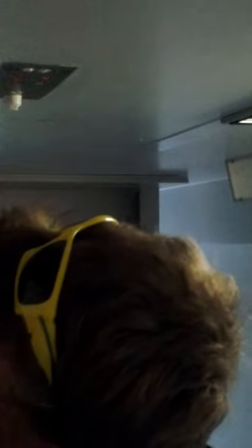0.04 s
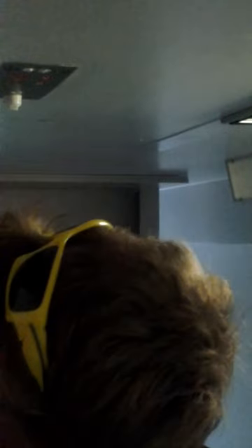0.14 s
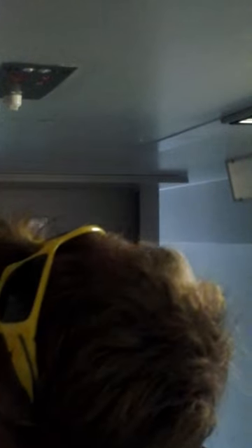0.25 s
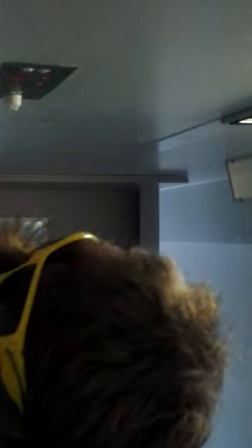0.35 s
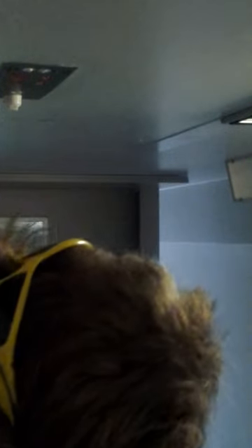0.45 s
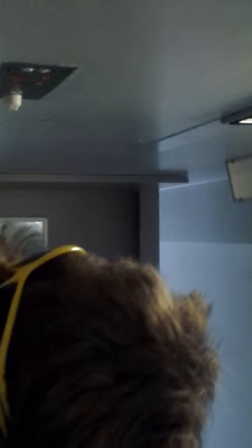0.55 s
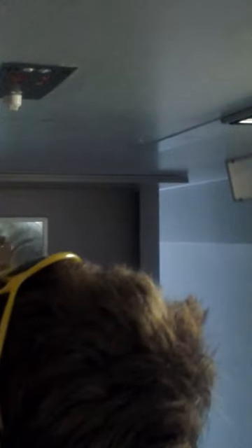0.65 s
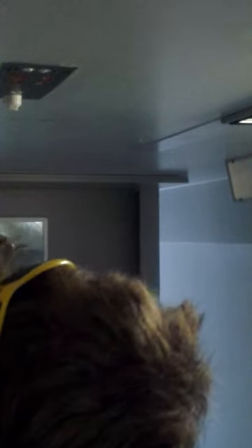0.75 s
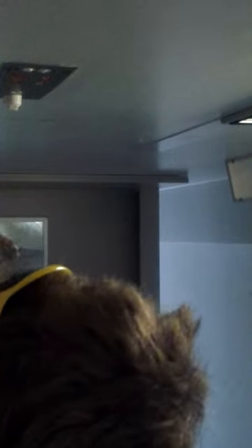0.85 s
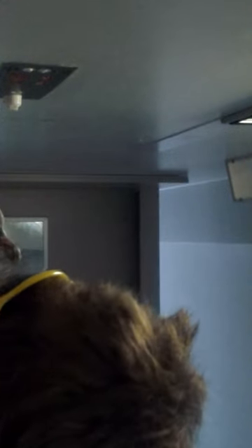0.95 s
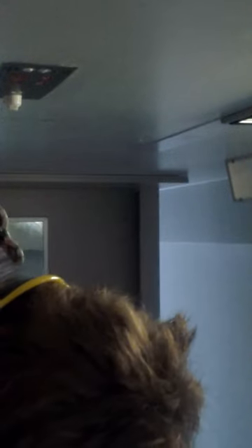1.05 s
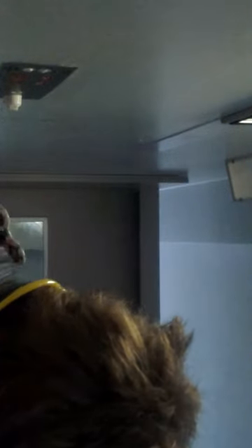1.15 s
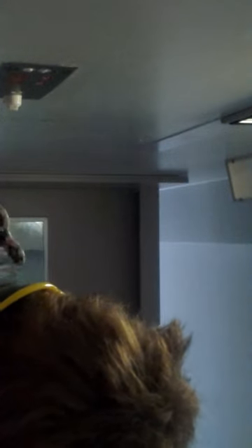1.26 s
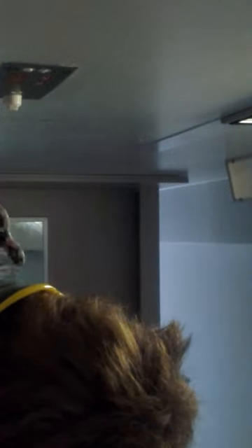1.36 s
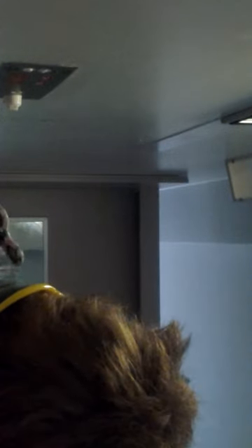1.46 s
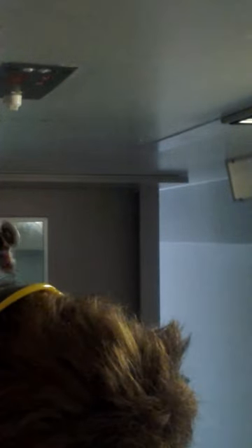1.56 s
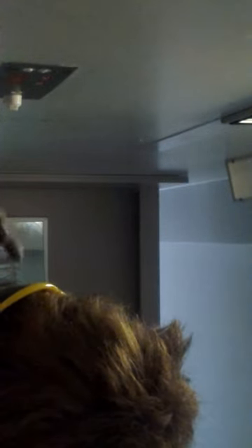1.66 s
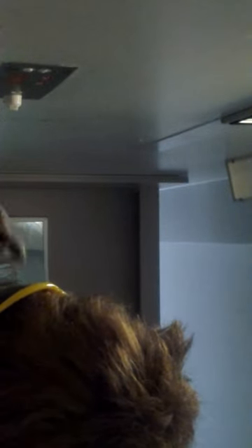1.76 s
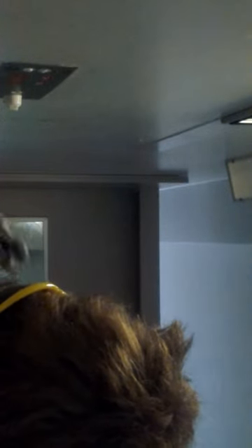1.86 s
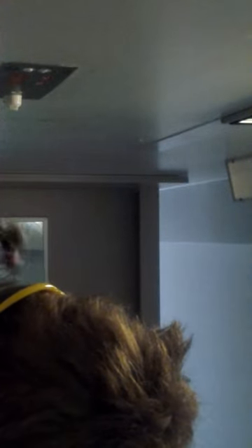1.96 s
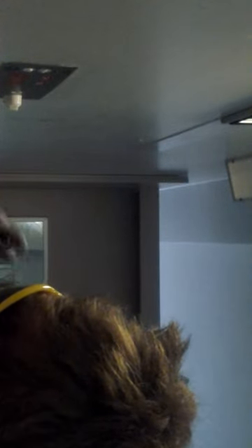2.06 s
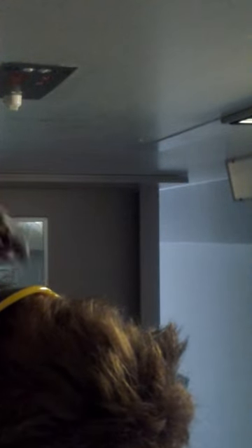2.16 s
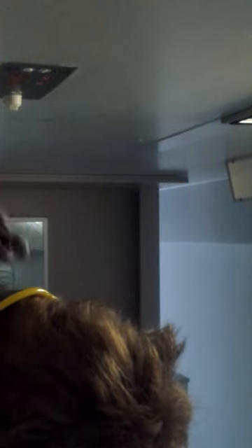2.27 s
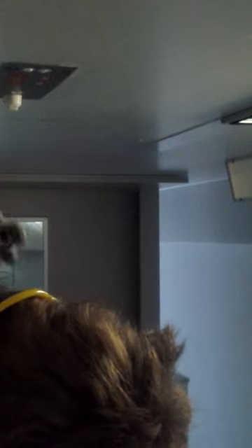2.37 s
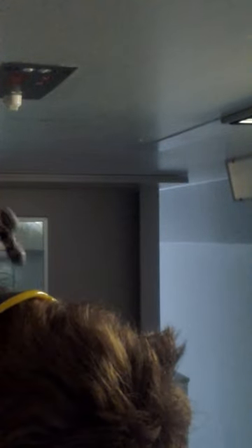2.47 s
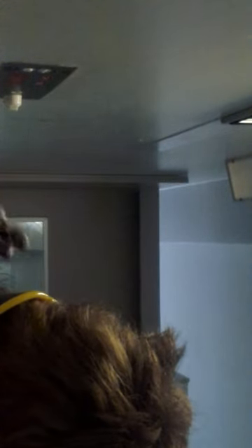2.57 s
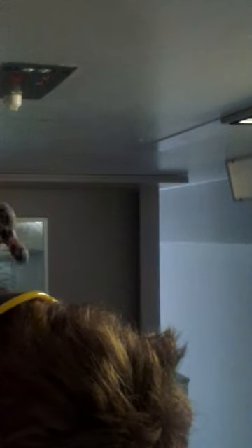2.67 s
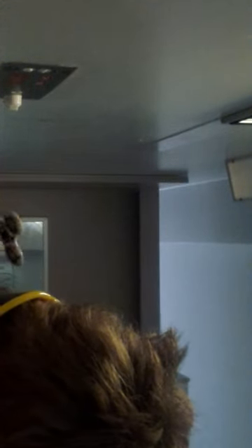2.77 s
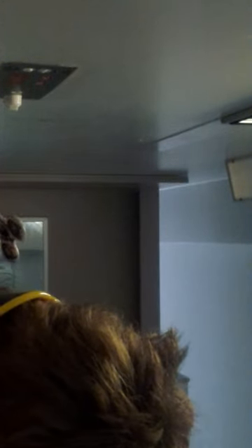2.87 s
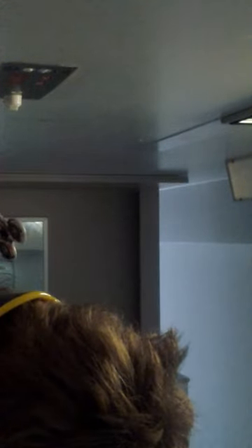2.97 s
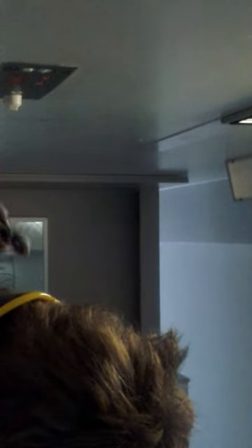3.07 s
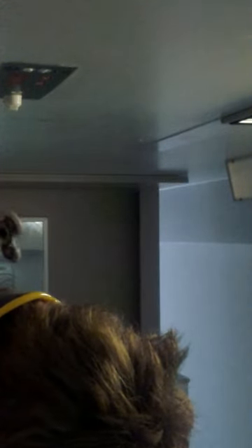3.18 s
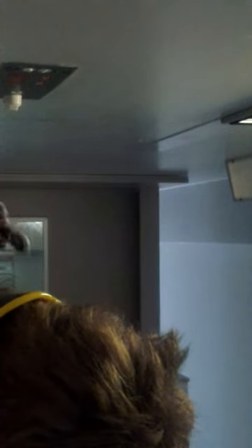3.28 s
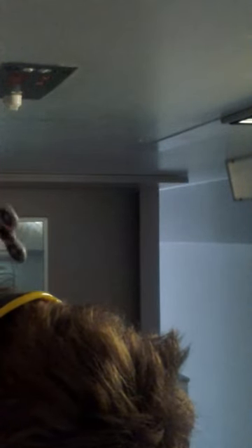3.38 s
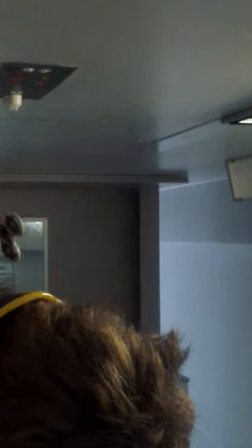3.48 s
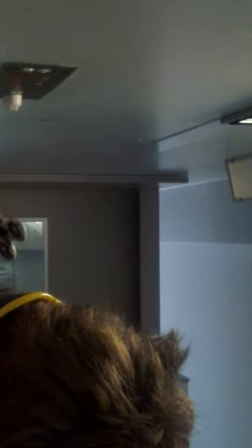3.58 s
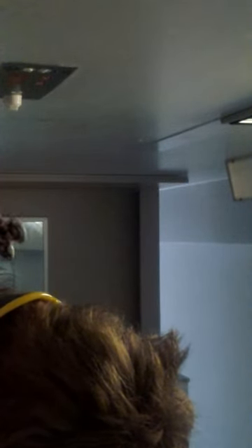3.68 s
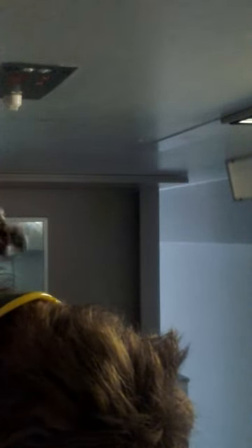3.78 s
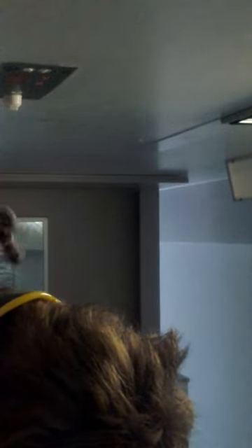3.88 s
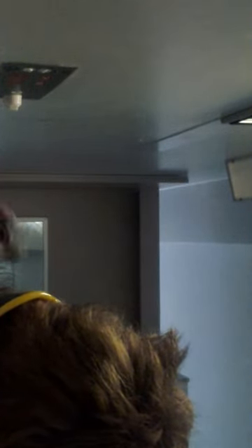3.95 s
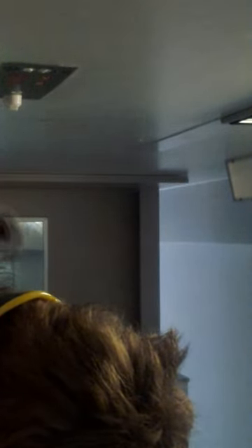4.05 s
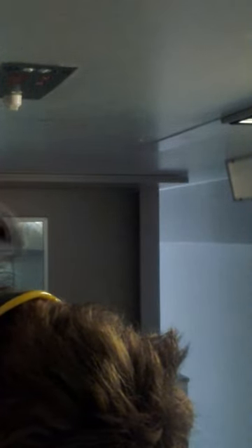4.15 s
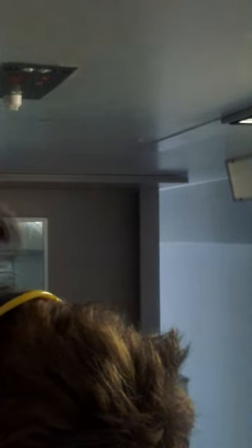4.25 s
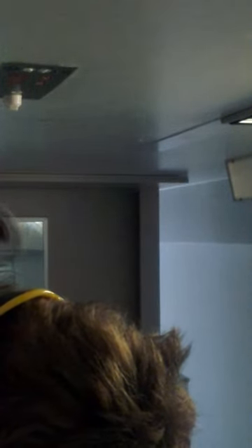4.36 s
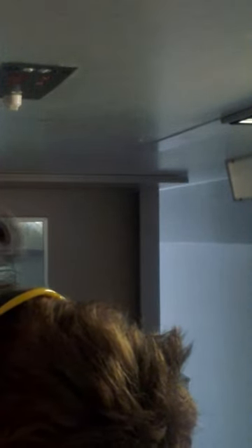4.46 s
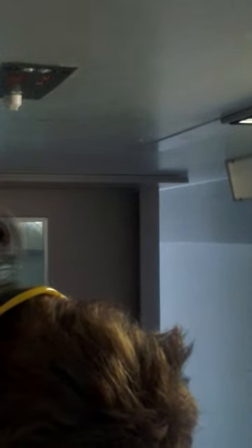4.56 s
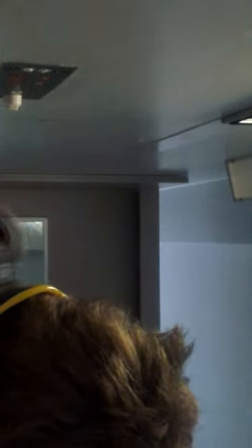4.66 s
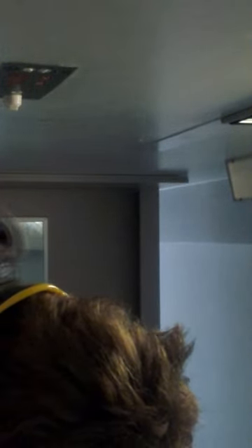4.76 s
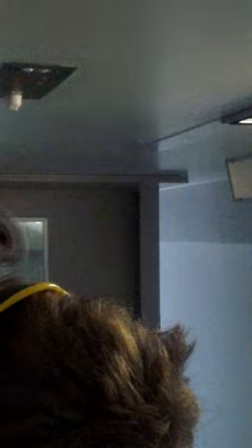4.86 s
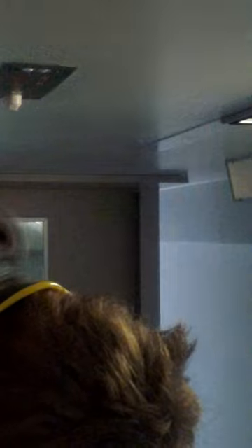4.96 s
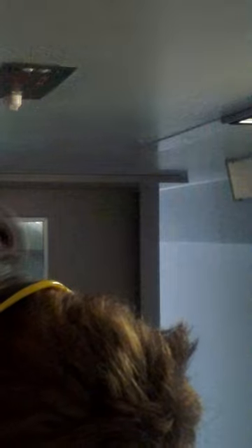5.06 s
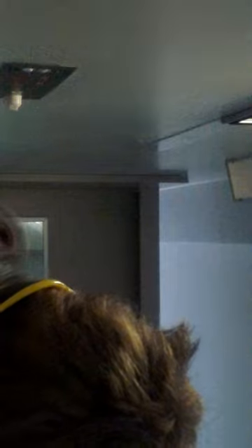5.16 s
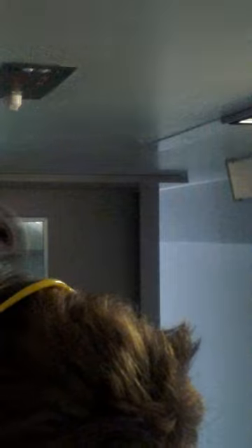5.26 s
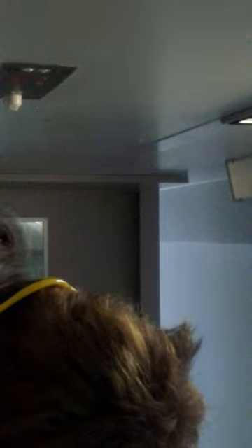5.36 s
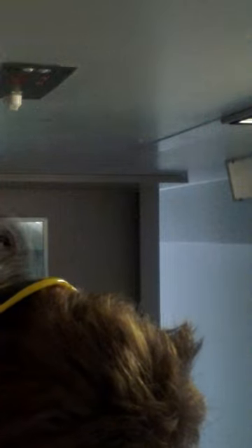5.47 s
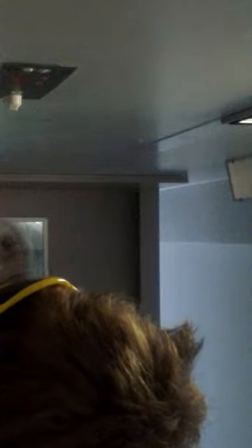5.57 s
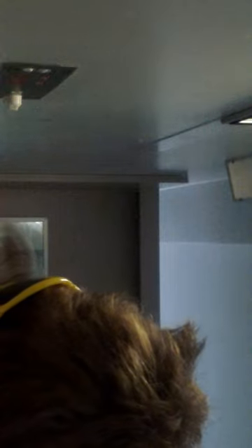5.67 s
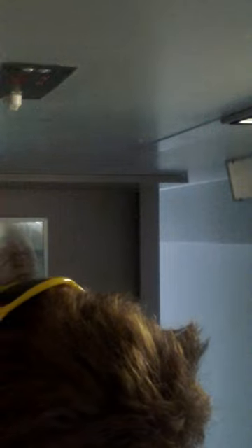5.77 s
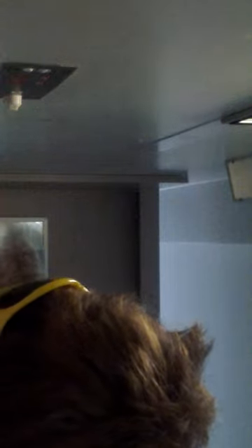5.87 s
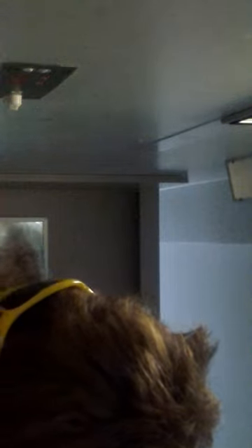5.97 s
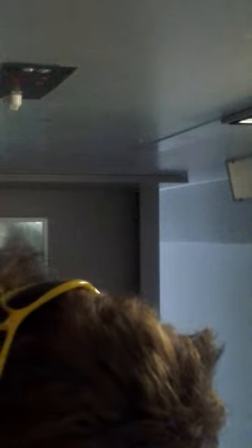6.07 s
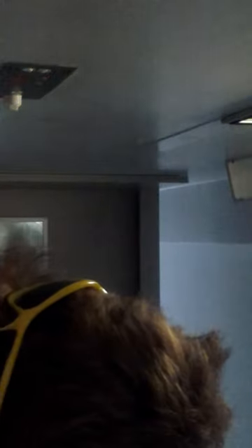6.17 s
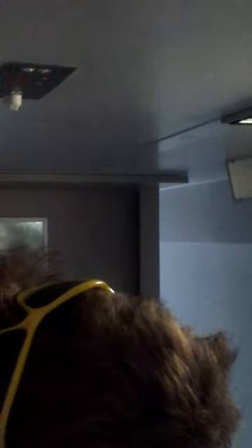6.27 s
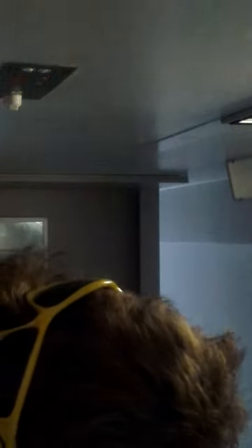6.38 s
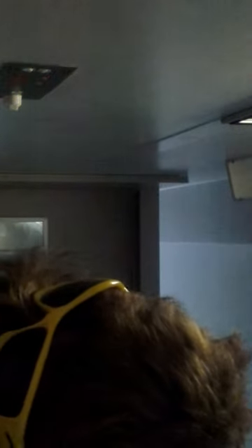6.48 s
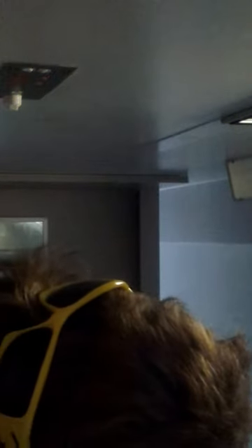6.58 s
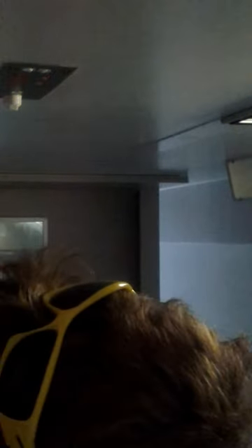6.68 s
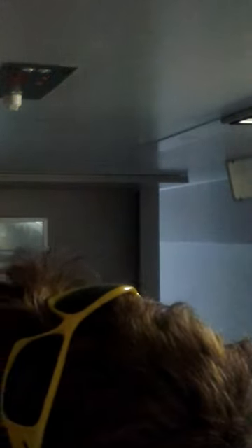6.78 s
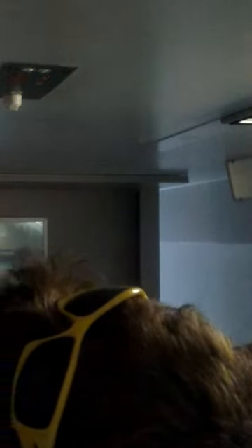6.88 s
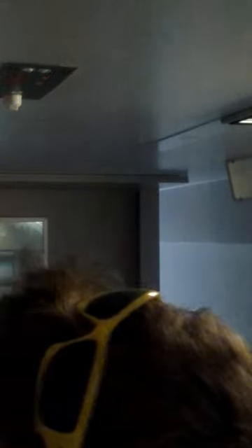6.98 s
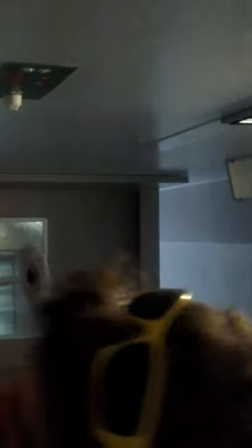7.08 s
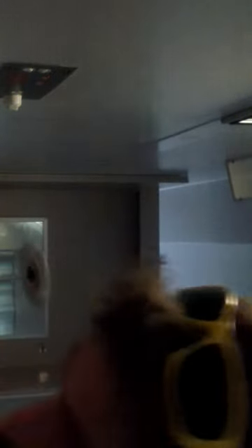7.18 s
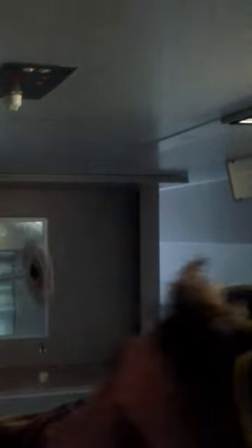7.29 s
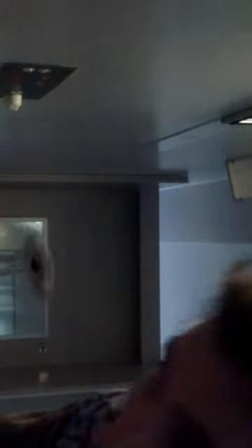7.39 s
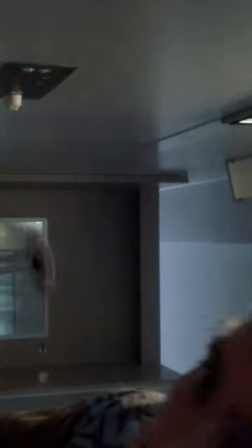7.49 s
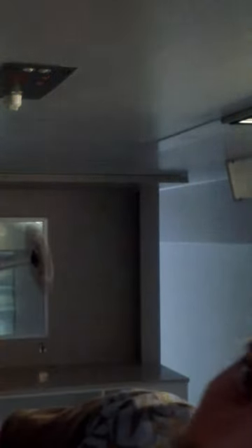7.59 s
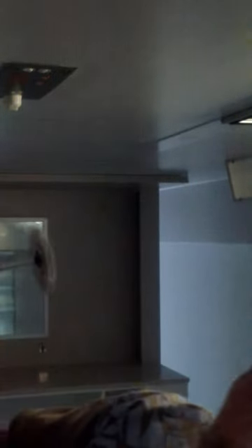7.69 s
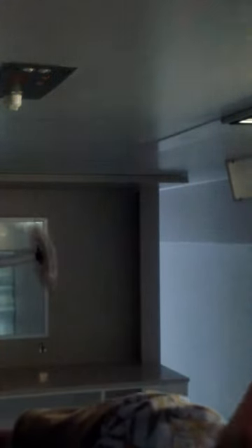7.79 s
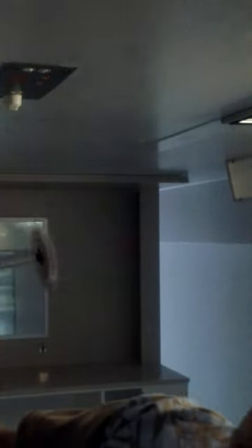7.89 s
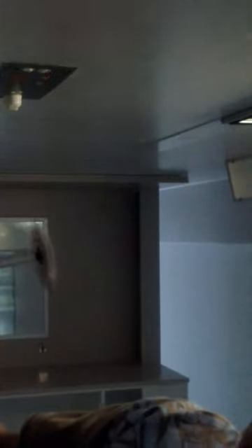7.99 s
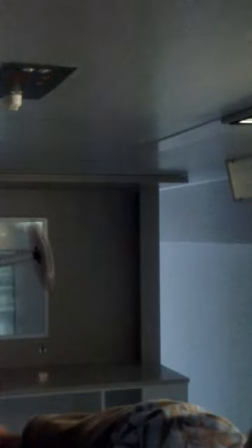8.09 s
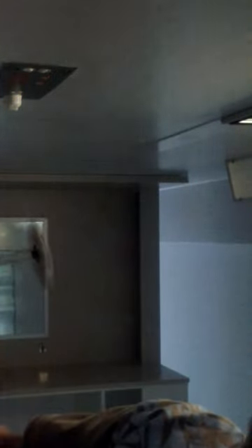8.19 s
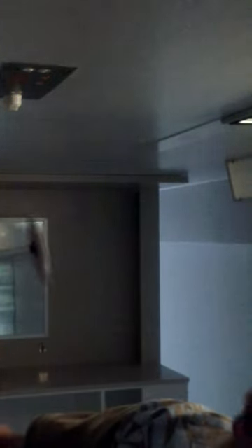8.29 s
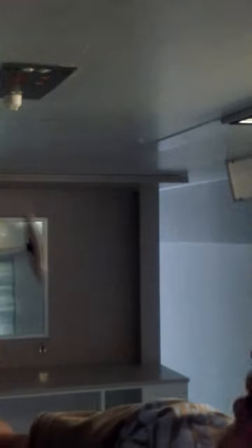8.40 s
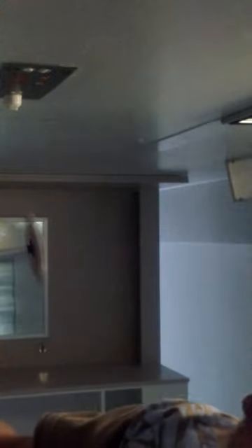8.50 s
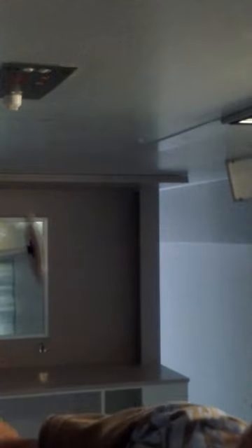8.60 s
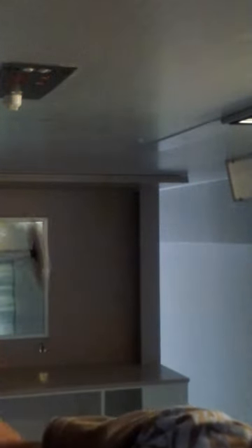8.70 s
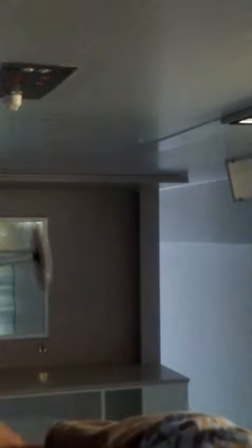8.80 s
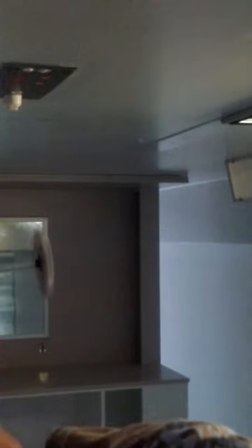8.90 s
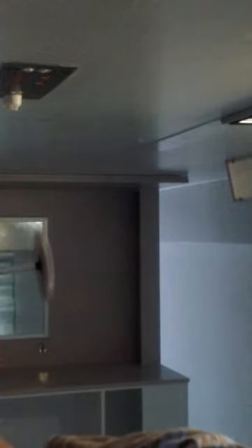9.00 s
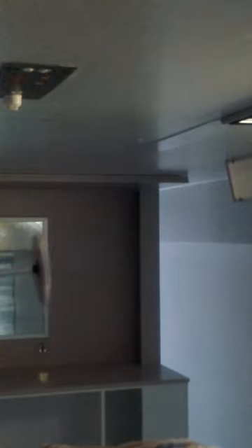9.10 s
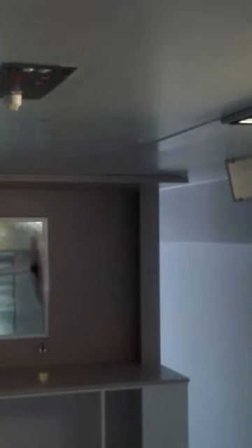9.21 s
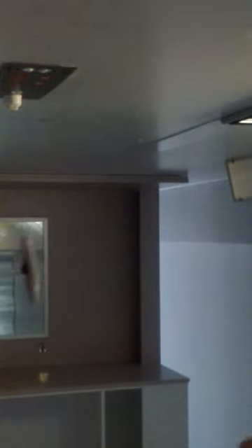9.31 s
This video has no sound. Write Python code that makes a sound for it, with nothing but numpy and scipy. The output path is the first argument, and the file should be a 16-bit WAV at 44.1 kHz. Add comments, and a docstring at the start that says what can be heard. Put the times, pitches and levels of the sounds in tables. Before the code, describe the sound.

Quiet room hush with faint low rumble opens. From one and a half seconds a small electric hand tool is blipped five times, each a tiny dry buzz with clicks. Just before four seconds it is held: a harsh hissing whirr with hard metallic rattling, climbing in pitch. The rattle thins, a toy spinner's air rush swells, and late bursts of metallic ticks grow longer and slower. Close phone microphone, mono, little bass.

```python
"""A harsh electric whirr is blipped five times, then held, with a tick once a turn and a growing rush of air.
Place: a quiet room; a small electric hand tool drives a toy spinner near a phone, one microphone for both channels.
Brushes and gears are coloured noise, the bit and the spinner are struck once or twice a turn and ring their modes,
and the spinner's arms stir up noise that booms in the room. Late on, bit and spinner drift in and out of step,
heard as ever slower bursts of ticks."""
import sys
import numpy as np
from scipy import signal
from scipy.fft import rfft, irfft, next_fast_len
from scipy.io import wavfile
from scipy.ndimage import uniform_filter1d, map_coordinates

SR = 44100
rng = np.random.default_rng(int(sys.argv[2]) if len(sys.argv) > 2 else 0)


def wav_record(signal):
    """Record a signal, one row per channel, as 16-bit PCM in the file named by sys.argv[1]."""
    frames = np.transpose(np.atleast_2d(signal))
    bounded = np.clip(frames, -1, 1)
    # unit amplitude maps onto the largest positive 16-bit level
    quanta = np.round(bounded * 32767).astype(np.int16)
    wavfile.write(sys.argv[1], SR, quanta)


N = 411894

# Levels of colours and modes are relative within their layer.
# Short trigger pulls: [t/s, held/s, hiss level/dB, shell level/dB]
TRIGGER_PULLS = [(1.505, 0.061, -41.5, -53.5), (1.66, 0.055, -38.5, -48), (1.992, 0.045, -37.5, -49.5),
                 (3.063, 0.054, -37, -48), (3.789, 0.048, -40.5, -50.5)]
# Shaft speed: [t/s, rate/turns per s]
SHAFT_SPEED = [(3.9, 56), (4.2, 62), (4.26, 79), (4.41, 80.3), (4.55, 82.6), (4.7, 87), (4.86, 87.7),
               (4.9, 89.1), (4.93, 86), (4.96, 91.2), (5, 92.6), (5.125, 95.4), (5.2, 96.5), (5.3, 114),
               (5.6, 126), (6.2, 136), (6.9, 140), (7.5, 131), (8.1, 104), (9.34, 111)]
# Trigger held: [t/s, hiss level/dB, gain of the hiss's top end/dB, shell level/dB, throb level/dB]
HELD_LEVELS = [(3.95, -36, 1.5, -44, -54), (4.12, -31.5, -3, -48, -45.5), (4.3, -31, -5, -48, -49.5),
               (4.75, -32, -7.5, -43, -47.5), (5.15, -32.5, -10, -46, -47), (5.35, -30, 1.5, -44, -46.5),
               (5.65, -32, -0.5, -44, -43), (6, -32.5, -1.5, -44, -44.5), (6.6, -32, -1, -46, -42),
               (7.1, -32, -5.5, -42, -46), (7.6, -31.5, -6, -42.5, -43.5), (8.15, -36.5, -7.5, -42, -48.5),
               (8.8, -32.5, -7, -40.5, -45), (9.34, -32.5, -5.5, -40, -42.5)]
# Brush and gear hiss, spectrum: [f/Hz, level/dB per Hz]
HISS_COLOUR = [(880, -23), (1500, -5), (1940, -4.5), (2560, -10.5), (3000, -7), (3500, -4.5), (4900, -4.5),
               (5630, -7), (9510, 1), (11400, 0.5), (13700, 3.5), (14600, -5.5)]
# Ringing metal of the tool: [f/Hz, width/Hz, level/dB]
METAL_MODES = [(4890, 390, -1.5), (5730, 950, -4.5), (7550, 320, 2), (9240, 89, 8), (10600, 400, -9),
               (15300, 400, -3)]
# Plastic shell: [f/Hz, width/Hz, level/dB]
HOUSING_MODES = [(561, 197, -1)]
# Chuck, forced once a turn: [f/Hz, width/Hz, level/dB]
CHUCK_MODES = [(1298, 440, 0)]
# Shaft tones: [multiple of the shaft speed, from t/s, to t/s, level/dB]
SHAFT_TONES = [(15, 5.3, 6.8, -59), (3, 4.22, 4.72, -57), (2, 5.2, 5.45, -58), (1, 6.68, 6.97, -55.5)]
# The bit scrapes and the hiss flares: [t/s, rise above the hiss/dB]
SCRAPES = [(4.276, 5.5), (4.289, 5), (4.598, 8), (4.716, 4), (4.81, 7.5), (4.897, 5), (4.911, 8)]
# Loudest ticks of the bit: [t/s, level before the ring/dB]
LOUD_TICKS = [(1.517, -36), (1.5246, -35), (1.5375, -28), (1.542, -26), (1.548, -21), (1.5686, -32),
              (1.5762, -27), (1.6734, -32), (1.6842, -22), (1.7061, -22), (1.7137, -26), (1.7378, -32),
              (2.0096, -29), (2.0205, -29), (2.0294, -24), (2.0388, -22), (2.0761, -36), (3.0783, -25),
              (3.091, -26), (3.0968, -13), (3.1631, -34), (3.8041, -27), (3.8123, -23), (3.823, -26),
              (3.8403, -26), (3.8501, -31), (3.9353, -25), (3.9437, -21), (3.9557, -22), (3.9612, -15),
              (3.9685, -24), (3.9774, -8), (3.9889, -23), (3.994, -12), (4.0057, -15), (4.0115, -14),
              (4.0228, -17), (4.0288, -17), (4.04, -14), (4.0575, -18), (4.074, -17), (4.085, -21),
              (4.0907, -22), (4.1016, -11), (4.1088, -22), (4.1193, -19), (4.1367, -21), (4.1473, -16),
              (4.1639, -13), (4.1814, -21), (4.1925, -17), (4.198, -20), (4.2206, -18), (4.2363, -23),
              (4.3004, -20), (4.3646, -19), (4.4146, -19), (4.4272, -19), (4.4518, -17), (4.599, -17),
              (4.6206, -21), (4.6803, -18), (4.6924, -18), (4.7379, -21), (4.7493, -20), (4.816, -20),
              (5.0728, -18)]
# Once-a-turn contact of the bit: [t/s, tick level/dB, knock level/dB], both before the ring
TURN_CONTACT = [(4.24, -60, -60), (4.27, -24, -36), (4.44, -22, -33), (4.52, -29, -45), (4.63, -29, -40),
                (4.655, -22, -27), (4.71, -23, -28), (4.73, -24, -32), (4.77, -24, -26), (4.8, -25, -30),
                (4.85, -29, -40), (4.9, -27, -28), (4.94, -29, -40), (4.965, -22, -26), (5.01, -23, -26),
                (5.03, -25, -31), (5.065, -22, -25), (5.14, -25, -32), (5.16, -23, -27), (5.19, -23, -29),
                (5.22, -28, -35), (7.3, -32, -40), (8, -61, -66)]
# What each once-a-turn knock rings low down: [f/Hz, width/Hz, level/dB]
KNOCK_MODES = [(1310, 330, -1), (1890, 380, 0), (3150, 700, -5), (4700, 800, -8)]
# What an early tick rings in the shell: [f/Hz, width/Hz, level/dB]
SHELL_TAP_MODES = [(566, 50, -0.5), (900, 47, -12), (1410, 82, -6)]
# Bit and spinner in step:
# [middle t/s, length/s, level/dB near 3.3 kHz, level/dB near 4.5 kHz, level/dB near 6 kHz, level/dB above 7 kHz]
STEP_BURSTS = [(7.31, .01, -31, -35, -32, -27), (7.378, .01, -31, -33, -32, -27),
               (7.475, .01, -29, -28, -29, -25), (7.519, 0.011, -29, -29, -27, -23),
               (7.542, .01, -28, -30, -33, -20), (7.625, .01, -29, -28, -28, -31),
               (7.69, .01, -27, -34, -26, -26), (7.79, .01, -28, -32, -29, -30),
               (7.86, .022, -25, -25, -29, -25), (7.893, 0.016, -24, -34, -23, -19),
               (7.933, 0.016, -32, -30, -25, -22), (7.965, 0.018, -26, -31, -29, -27),
               (8.006, 0.02, -30, -24, -29, -24), (8.05, 0.028, -26, -22, -27, -29),
               (8.1, 0.037, -23, -22, -22, -25), (8.158, 0.044, -24, -37, -21, -25),
               (8.222, 0.034, -24, -29, -19, -30), (8.317, 0.051, -25, -28, -22.5, -28),
               (8.439, 0.05, -22, -37, -20, -29), (8.656, 0.075, -20.5, -40, -22.5, -28),
               (9.061, 0.17, -21, -40, -23, -21.5)]
# The spinner's steel weights: [f/Hz, width/Hz, level/dB]
WEIGHT_MODES = [(3390, 190, -7), (4490, 140, 2), (5530, 370, -7.5), (5940, 510, -2), (7570, 250, -7),
                (9240, 230, 1)]
# Narrow rings of the spinner: [f/Hz, width/Hz, from t/s, to t/s, level/dB]
SPINNER_RINGS = [(4600, 140, 4.99, 5.01, -43), (4460, 81, 7.54, 7.64, -49.5), (4180, 80, 7.58, 7.78, -53),
                 (4200, 90, 8.15, 8.18, -49)]
# Air stirred by the arms: [t/s, rush level/dB, low boom level/dB]
STIRRED_AIR = [(3.95, -54, -84), (4.5, -53, -76), (6, -48.5, -55), (6.6, -45, -50.5), (7.5, -44, -49),
               (7.9, -40, -47.5), (8.2, -39, -46), (8.8, -34.5, -46), (9.34, -33.5, -53)]
# Air rush, spectrum: [f/Hz, level/dB per Hz]
RUSH_COLOUR = [(65, -62), (110, 2.5), (212, 13.5), (679, 0.5), (877, 8.5), (1210, -4.5), (1370, 7),
               (5000, -2.5), (6500, -5), (11000, -120)]
# Room modes under the rush: [f/Hz, width/Hz, level/dB]
BOOM_MODES = [(195.6, 19, 7.5), (304, 63, 0), (500, 120, -8), (615, 29, 0), (731, 58, 7.5), (898, 27, 4.5),
              (1008, 18, 10.5), (1120, 22, 8), (1430, 53, -9)]
# Narrow room modes that sing in the late rush: [f/Hz, width/Hz, level/dB]
SINGING_MODES = [(755, 40, -1.5), (895, 40, -2), (1006, 21, 2)]
# Strength of that singing: [t/s, level/dB]
SINGING_LEVEL = [(7.9, -67), (8.08, -45), (8.3, -45), (8.7, -43), (9.34, -40.5)]
# Decay of the room's answer: [f/Hz, t60/s]
WALL_DECAY = [(200, 1), (1500, 0.12), (6000, 0.19), (14000, 0.1)]
# Room and microphone hush, spectrum: [f/Hz, level/dB per Hz]
ROOM_COLOUR = [(12, -47), (20, -24.5), (154, -5), (198, -9), (254, -11.5), (550, -37), (597, -36),
               (832, -25), (2440, -21), (2650, -21.5), (4480, -26.5), (11800, -25.5), (14700, -25.5)]
# Low rumble of the room: [t/s, level/dB]
RUMBLE_LEVEL = [(0, -53.5), (.5, -57), (.7, -56), (1.4, -58), (1.9, -57.5), (2.6, -62.5), (3.3, -57.5),
                (3.8, -62.5)]
# Faint airy band near 1.1 kHz that comes and goes: [t/s, level/dB]
AIRY_LEVEL = [(0, -59), (.33, -64), (.42, -82), (.6, -80), (.66, -61), (.88, -67), (1, -74), (9.34, -80)]

TOUCH_S = 4.4508  # a moment at which the bit touches
COAST_DB_PER_S, SHELL_RINGS_DB_PER_S = 307, 210  # how fast hiss and shell die after a pull
TONE_FADE_DB_PER_S, RING_FADE_DB_PER_S = 150, 500  # fades either side of a tone's or ring's span
THROB_BLURS_S = 7.8  # from here the chuck is forced more evenly
SCRAPE_S = 0.0051  # time from a scrape's peak to 1/e of its rise in dB
CHATTER_PER_S, CHATTER_DB, SEATED_S = 130, 6, 4.3  # lesser ticks: rate, gain over the hiss, until the bit seats
SCUFF_DB, SCUFF_GROWS = -24, 0.62  # dull part of a tick: offset and dB per dB of the tick
TAP_DB = 37  # gain from the dull blow into the shell
EDGE_HZ, TOP_HZ = 14700, 15859  # upper limit of the sound: very faint above the edge, silent from the top


def amp(db):
    """Decibels to amplitude factor."""
    return 10 ** (np.asarray(db) / 20)


def unit(x):
    """Scale to rms 1."""
    return x / np.sqrt(np.mean(x ** 2) + 1e-20)


def along(points, hz):
    """Interpolate (f/Hz, value) points on a log frequency axis."""
    f, v = np.transpose(points)
    return np.interp(np.log(hz + 1), np.log(f + 1), v)


def curves(rows):
    """One value per sample for each column after the time."""
    s, *cols = np.transpose(rows)
    return [np.interp(np.arange(N) / SR, s, c) for c in cols]


def wobble(rate):
    """A smooth random curve, rate knots a second."""
    knots = rng.standard_normal(int(N * rate / SR) + 4)
    return map_coordinates(knots, [np.arange(N) * rate / SR])


def filtered(x, response):
    """Multiply the spectrum of x by a complex response of frequency."""
    m = next_fast_len(N + SR // 2)
    return irfft(rfft(x, m) * response(np.fft.rfftfreq(m, 1 / SR)), m)[..., :N]


def modes(table, f, sign=-1):
    """Causal response of a set of resonances; sign 1 leaves dark valleys between them."""
    return sum(sign ** k * amp(db) * 1j * f * width / (centre * centre - f * f + 1j * f * width)
               for k, (centre, width, db) in enumerate(table))


def highpass(f, hz):
    """Causal second-order low cut."""
    return -f * f / (hz * hz - f * f + 1.4j * f * hz)


def noise(response, patchy_db):
    """Coloured noise of rms 1 with time-frequency patches of random gain."""
    z = signal.stft(rng.standard_normal(N), nperseg=512)[2]
    field = uniform_filter1d(rng.standard_normal(z.shape), 6, 0)
    field = uniform_filter1d(field, 12, 1)
    patched = signal.istft(z * amp(patchy_db * unit(field)), nperseg=512)[1][:N]
    return unit(filtered(patched, response))


def crackle(blows, ms):
    """Each blow becomes a spurt of noise: a soft swell times a decay of 60 dB in ms."""
    t = np.arange(SR // 50) / SR
    shape = amp(-60000 * t / ms) * (1 - np.exp(-(t / .0013) ** 2))
    return signal.fftconvolve(blows, shape / shape.max())[:N] * np.sign(rng.standard_normal(N))


def running():
    """Held trigger: 0, then a quick start to 1 that lasts to the end."""
    return np.clip((np.arange(N) / SR - 3.925) / 0.019, 0, 1) ** 2


def trigger_blips(column, fade_db_per_s):
    """Level of one layer of the short pulls: quick start, coasting stop."""
    t = np.arange(N) / SR
    level = 0
    for row in TRIGGER_PULLS:
        start, held = row[:2]
        coast_s = np.clip(t - start - held, 0, 1)
        attack = np.clip((t - start) / 0.016, 0, 1) ** 2
        level = level + amp(row[column] - fade_db_per_s * coast_s) * attack
    return level


def turns():
    """Shaft angle in turns: the integral of speed, whole when the bit touches."""
    angle = np.cumsum(curves(SHAFT_SPEED)[0]) / SR
    return angle - angle[round(TOUCH_S * SR)] % 1


def motor(angle):
    """Brush and gear hiss, the humming shell, the chuck throbbing once a turn, and the shaft tones."""
    t = np.arange(N) / SR
    hiss_db, top_db, shell_db, throb_db = curves(HELD_LEVELS)
    hiss_colour = lambda f: amp(along(HISS_COLOUR, f)) * (1 + 0.38 * np.abs(modes(METAL_MODES, f)))
    flutter_db = 0.44 * wobble(60) + 0.95 * wobble(300) + 1.7 * wobble(2500)
    hiss = noise(hiss_colour, patchy_db=1.0) * amp(flutter_db)
    top = filtered(hiss, lambda f: 1 / (1 + (10500 / (f + 1)) ** 12))
    hiss = hiss + top * (amp(top_db) - 1) * running()  # the top end changes as the tool turns away

    shell_body = lambda f: 0.37 * highpass(f, 420) / (1 + (f / 2200) ** 4)
    shell = noise(lambda f: modes(HOUSING_MODES, f) ** 2 + shell_body(f), patchy_db=1.5)

    # forced hardest at one point of each turn
    kick = 0.057 + np.clip((t - THROB_BLURS_S) / 0.17, 0, 2) + np.exp(-4.5 * (angle % 1))
    even_kick = kick / np.sqrt(uniform_filter1d(kick ** 2, size=4410))
    throb = unit(filtered(even_kick * rng.standard_normal(N), lambda f: modes(CHUCK_MODES, f) ** 2))

    tones = 0
    for order, start, end, db in SHAFT_TONES:
        outside_s = np.maximum(0, np.maximum(start - t, t - end))
        tone_db = db - TONE_FADE_DB_PER_S * outside_s + 3.7 * wobble(17)
        tones = tones + amp(tone_db) * np.sin(2 * np.pi * order * angle)

    flare_db = sum(db * np.exp(-((t - s) / SCRAPE_S) ** 2) for s, db in SCRAPES) + 2.0 * wobble(4.6)
    steady = hiss * amp(hiss_db + flare_db)
    steady = steady + shell * amp(shell_db + 0.77 * wobble(16))
    steady = steady + throb * amp(throb_db + 0.72 * wobble(11))
    pulled_hiss = trigger_blips(2, COAST_DB_PER_S) * hiss
    pulled_shell = trigger_blips(3, SHELL_RINGS_DB_PER_S) * shell
    return running() * steady + pulled_hiss + pulled_shell + tones


def bit(angle):
    """The loose bit strikes once a turn at uneven strength, and about twice a turn, unevenly, as the tool
    starts, with lesser scattered ticks."""
    early = np.arange(N) / SR < SEATED_S
    once = np.diff(np.floor(angle), prepend=0) * running()
    tick_db, knock_db = curves(TURN_CONTACT)
    starting = 0.56 * trigger_blips(2, COAST_DB_PER_S) + running() * amp(HELD_LEVELS[0][1]) * early
    chatter = rng.random(N) < CHATTER_PER_S / SR
    uneven = chatter * starting * amp(CHATTER_DB + 1.5 * rng.standard_normal(N))
    for s, db in LOUD_TICKS:  # placed 1 ms early, since the spurt swells after first contact
        uneven[round(s * SR) - SR // 1000] += amp(db)
    clear = uniform_filter1d(uneven, size=400) < 1e-9  # a listed tick is the turn's own, so no second one is added
    bright = clear * once * amp(tick_db + 1.6 * rng.standard_normal(N)) + uneven
    dull = early * amp(SCUFF_DB) * uneven ** SCUFF_GROWS

    snap_ring = lambda f: highpass(f, 4170) ** 3 * (1 + .5 * modes(METAL_MODES, f))
    snap = filtered(crackle(1.25 * bright, ms=3.6), snap_ring)
    scuff = filtered(crackle(dull, ms=16), lambda f: highpass(f, 580) / (1 + (f / 4500) ** 4))
    shell_tap = filtered(amp(TAP_DB) * dull, lambda f: modes(SHELL_TAP_MODES, f))

    # a one-sample blow rings narrow modes about 35 dB below its own height; a rough spurt goes with it
    blows = once * amp(knock_db + 2 * rng.standard_normal(N))
    spurts = amp(31) * blows + amp(7) * crackle(blows, ms=9)
    knock = filtered(spurts, lambda f: sum(modes([row], f) ** 2 for row in KNOCK_MODES))
    return snap + scuff + shell_tap + knock


def spinner(angle):
    """In a burst the bit strikes the spinner twice a turn and rubs it; each burst favours other modes."""
    t = np.arange(N) / SR
    strikes = np.diff(np.floor(angle), prepend=0)
    strikes = strikes + 0.43 * np.diff(np.floor(angle + .45), prepend=0)
    struck = crackle(strikes * amp(7.0 + 0.93 * rng.standard_normal(N)), ms=8.6)
    rubbed = amp(-7.0) * rng.standard_normal(N)
    gates = sum(amp(levels_db)[:, None] * np.exp(-((t - s) / (length / 2)) ** 4)
                for s, length, *levels_db in STEP_BURSTS)
    ring = lambda f: 0.35 * highpass(f, 1900) / (1 + (f / 11000) ** 6) + 1.08 * modes(WEIGHT_MODES, f)
    above = lambda f, hz: 1 / (1 + (hz / (f + 1)) ** 16)
    # four neighbouring bands, one for each level of a burst
    bands = lambda f: -np.diff([1 + 0 * f, above(f, 4100), above(f, 5000), above(f, 6900), 0 * f], axis=0)
    return filtered(gates * (struck + rubbed), lambda f: ring(f) * bands(f)).sum(axis=0)


def rings():
    """Single modes of the spinner, narrow bands of noise, whistle for a moment."""
    t = np.arange(N) / SR
    total = 0
    for hz, width, start, end, db in SPINNER_RINGS:
        outside_s = np.maximum(0, np.maximum(start - t, t - end))
        whistle = noise(lambda f: modes([(hz, width, 0)], f) ** 2, patchy_db=0.5)
        total = total + amp(db - RING_FADE_DB_PER_S * outside_s) * whistle
    return total


def air():
    """The arms of the spinner stir the air into broad noise; the room's modes boom and sing along."""
    rush_db, boom_db = curves(STIRRED_AIR)
    colour = lambda f: amp(along(RUSH_COLOUR, f)) * (1 + np.abs(modes(BOOM_MODES, f)))
    low = lambda f: 1 / (1 + (f / 260) ** 8)
    rush = amp(rush_db) * noise(lambda f: colour(f) * (1 - low(f)), patchy_db=1.4)
    boom = amp(boom_db + 2.1 * wobble(8.7)) * noise(lambda f: colour(f) * low(f), patchy_db=1.0)
    sing_colour = lambda f: sum(modes([row], f) ** 2 for row in SINGING_MODES)
    sing = amp(curves(SINGING_LEVEL)[0]) * noise(sing_colour, patchy_db=-0.5)
    return running() * amp(0.96 * wobble(16)) * (rush + boom + sing)


def walls(x):
    """The room's answer: a noise tail in which each frequency dies at its own speed."""
    hz, t, z = signal.stft(rng.standard_normal(SR // 2), SR, nperseg=256)
    decay = amp(-60 * t / along(WALL_DECAY, hz)[:, None])
    tail = signal.istft(z * decay, SR, nperseg=256)[1]
    delayed = np.pad(x, (200, 0))  # samples
    return signal.fftconvolve(delayed, tail / np.linalg.norm(tail))[:N]


def room_tone():
    """Steady hush of room and microphone, a faint airy band and a wavering low rumble, all coloured noise."""
    hush = amp(-57.5) * noise(lambda f: amp(along(ROOM_COLOUR, f)), patchy_db=0.9)
    rumble_db = curves(RUMBLE_LEVEL)[0] + 0.92 * wobble(5.3)
    airy = amp(curves(AIRY_LEVEL)[0]) * noise(lambda f: modes([(1090, 310, 0)], f) ** 2, patchy_db=2.5)
    rumble = amp(rumble_db) * noise(lambda f: modes([(320, 660, 0)], f) ** 2, patchy_db=1.7)
    return hush + airy + rumble


def scene():
    """One microphone feeds both channels: the tool and its room answer, stirred air and room tone."""
    angle = turns()
    tool = motor(angle) + bit(angle) + spinner(angle) + rings()
    heard = tool + amp(-12.0) * walls(tool) + air() + room_tone()
    return np.tile(heard, (2, 1))


def record(dry):
    """The phone cuts the bass while the sound is loud; the sound ends at an upper frequency limit."""
    loud_db = 10 * np.log10(np.abs(uniform_filter1d(dry[0] ** 2, size=2600)) + 1e-12)
    cut = np.clip((loud_db + 41.5) / 10, 0, .9)
    bass = filtered(dry, lambda f: 1 / (1 + (f / 160) ** 8))
    band = lambda f: np.where(f < EDGE_HZ, 1, amp(-39)) * (f < TOP_HZ)
    return filtered(dry - cut * bass, band)


dry = scene()
out = record(dry)
wav_record(out)
```